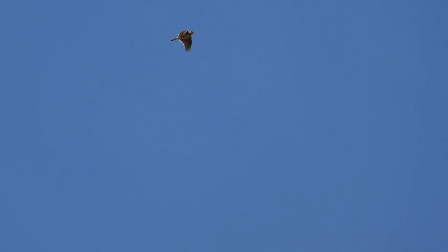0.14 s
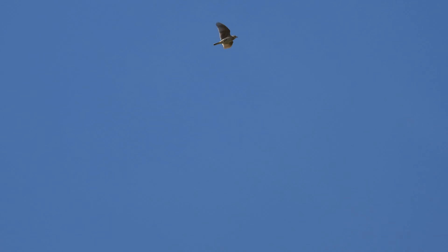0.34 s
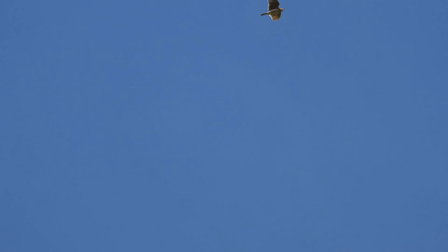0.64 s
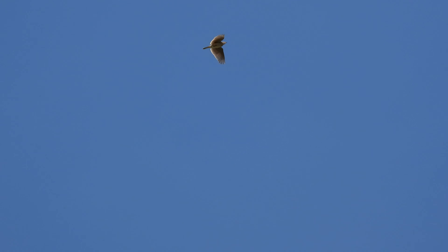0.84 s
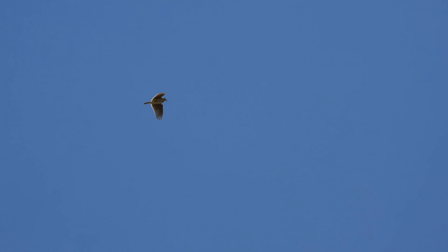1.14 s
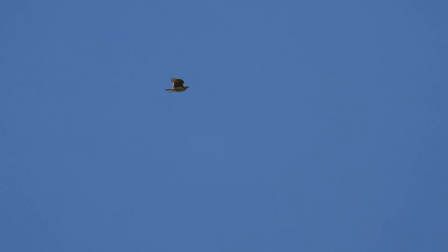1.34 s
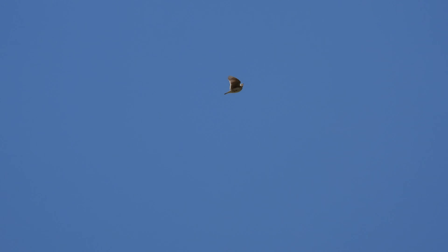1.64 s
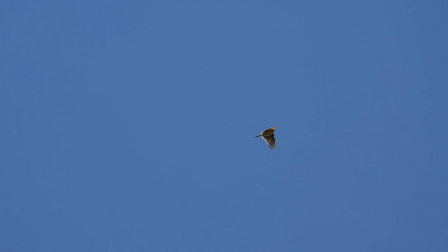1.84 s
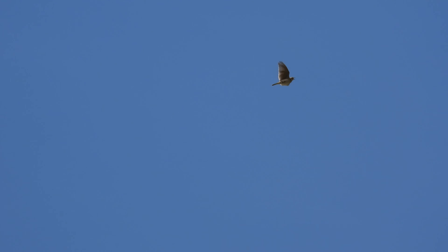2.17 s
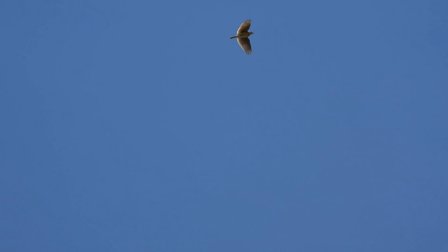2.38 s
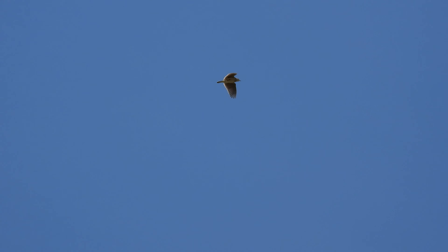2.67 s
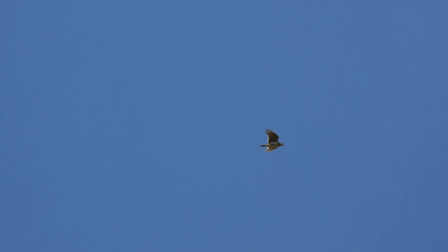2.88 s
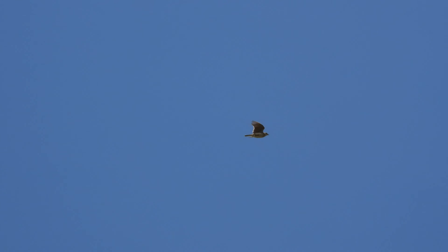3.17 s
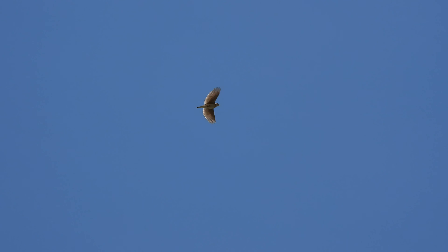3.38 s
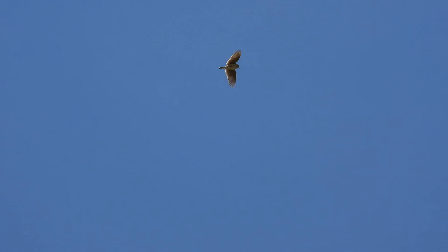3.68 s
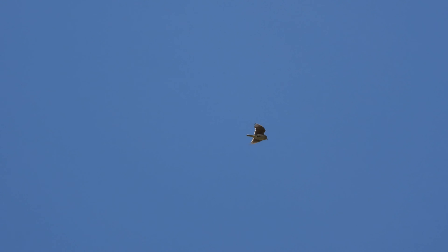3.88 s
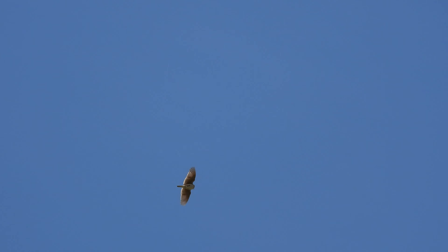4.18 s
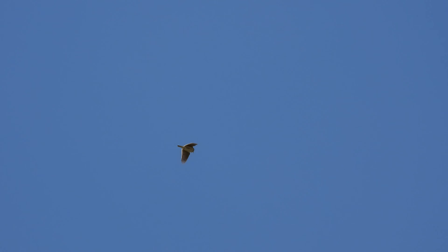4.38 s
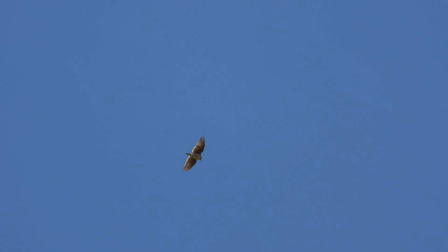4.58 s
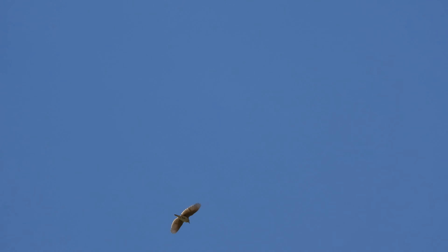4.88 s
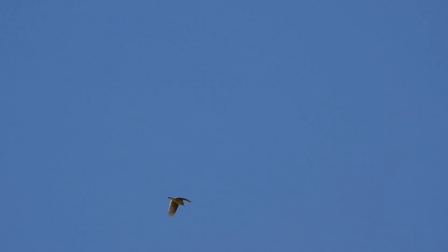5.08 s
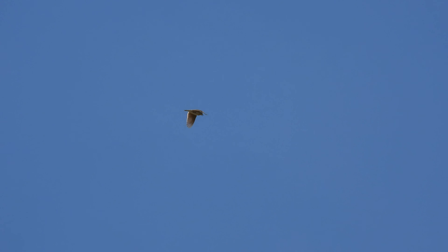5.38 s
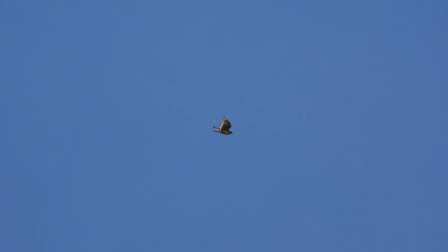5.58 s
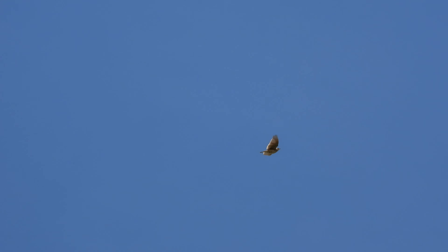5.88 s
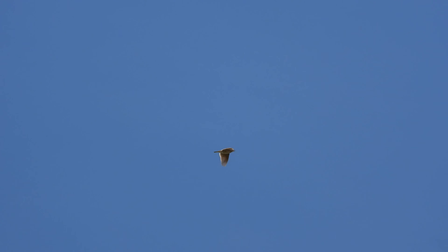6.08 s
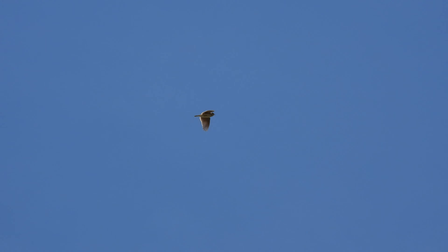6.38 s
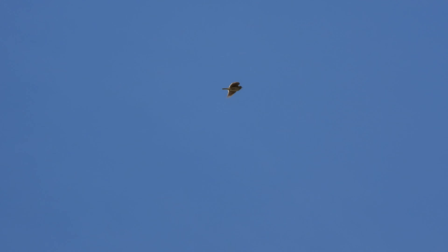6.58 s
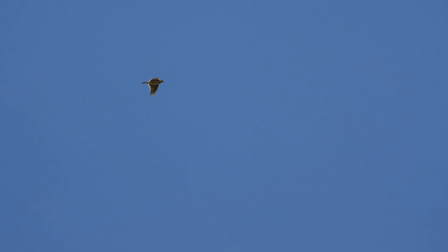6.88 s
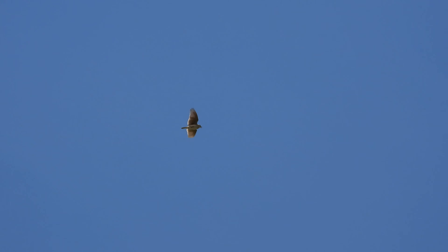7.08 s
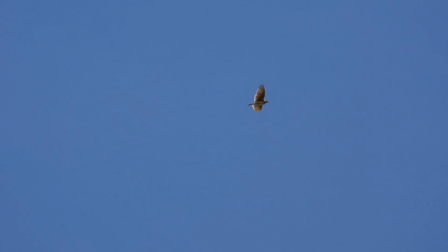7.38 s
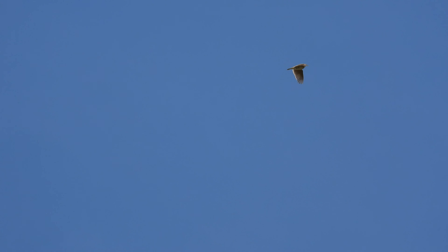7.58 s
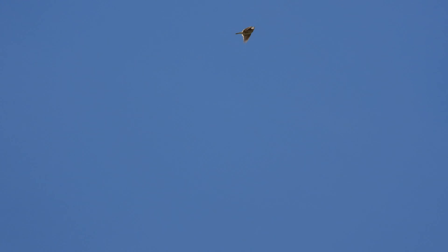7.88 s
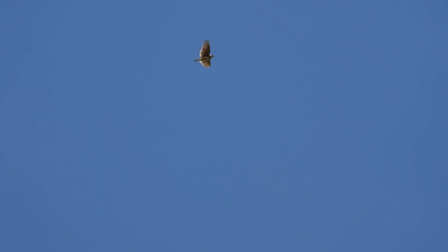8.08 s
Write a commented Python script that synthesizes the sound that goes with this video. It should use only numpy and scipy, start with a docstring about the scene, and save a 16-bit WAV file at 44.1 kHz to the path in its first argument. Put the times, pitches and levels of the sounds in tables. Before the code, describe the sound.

A skylark pours out rapid high trills, zigzag chirps and buzzes overhead while gusty wind rumbles and flaps against the microphone in open grassland.

```python
"""Open grass under gusty wind: a skylark sings overhead, fainter larks call further off, and a far hush lies behind.
The song is a frequency-modulated near sine: glides, zigzags, trills and buzzes from a two-sided syrinx.
Short faint sweeps give the far calls and low lead-ins to some buzzes; grass and ground scatter a thin haze.
Wind is filtered noise modulated in lumps, with thumps and flaps at two microphone ports.
Crackles and ticks are brief snaps, most of them much stronger at one port."""
import sys
import numpy as np
from scipy import signal
from scipy.fft import rfft, irfft, next_fast_len
from scipy.io import wavfile
from scipy.ndimage import uniform_filter1d

SR = 44100
rng = np.random.default_rng(int(sys.argv[2]) if len(sys.argv) > 2 else 0)


def to_wav(s):
    """Save 16-bit WAV."""
    ch = np.atleast_2d(s).T  # columns
    pcm = np.round(np.clip(ch, -1, 1) * 32767)  # PCM
    wavfile.write(sys.argv[1], SR, pcm.astype(np.int16))


N = 362943


def amp(db):
    """Decibel law: amplitude ratio of a level in dB."""
    return 10 ** (np.asarray(db) / 20)


def evened(x):
    """Normalisation: scales each channel to an rms of 1."""
    return x / np.sqrt(np.mean(x ** 2, -1, keepdims=True) + 1e-20)


def coloured(x, points):
    """Linear filtering: multiplies the spectrum by gains joined between points on a log frequency axis."""
    size = next_fast_len(x.shape[-1] + 4096, real=True)
    f, db = np.transpose(points)
    bins_hz = np.fft.rfftfreq(size, 1 / SR)
    gain = amp(np.interp(np.log(bins_hz + 1), np.log(f), db))
    return irfft(rfft(x, size) * gain, size)[..., :x.shape[-1]]


def wander(hz, channels):
    """Band-limited chance: noise of rms 1 that moves up to about hz times a second."""
    band = [(hz / 6, -12), (hz / 3, 0), (hz, -6), (hz * 3, -40), (hz * 12, -110)]
    return evened(coloured(rng.standard_normal((channels, N)), band))


def add(mix, s, sound):
    """Superposition: adds a sound to the mix from time s on."""
    part = mix[..., round(s * SR):][..., :sound.shape[-1]]
    part += sound[..., :part.shape[-1]]


def panned(sound, pan_db):
    """Level difference: the louder port keeps the level, the other falls by pan_db (plus is left)."""
    return sound * amp(np.minimum([[pan_db], [-pan_db]], 0))


# overall colour of the far hush: (f/Hz, gain/dB)
HUSH_COLOUR = [(25, -15.5), (45, -12.5), (70, -1.5), (100, 3.5), (300, 10.5), (1900, -11.5), (2100, -13.5),
               (5500, -25), (6500, -51), (7200, -83), (15000, -85.5)]


def air():
    """Independent modulation: a far hush whose low, middle and high parts drift apart."""
    bands = [[(900, -5.5), (1800, -34.5)],
             [(1000, -30), (2000, -7.0), (3000, -10.5), (4200, -23.0)],
             [(2800, -24.5), (4200, -3.5)]]
    hush = np.zeros((2, N))
    for band in bands:
        drift = amp(5.2 * wander(9.7, channels=1))
        hush += coloured(rng.standard_normal((2, N)) * drift, band)
    return amp(-49.5) * evened(coloured(hush, HUSH_COLOUR))


# the breeze between gusts: (t/s, strength level/dB, upper rustle level against it/dB)
BREEZE = [(0, -38.5, -22), (.2, -35.5, -25.5), (0.548, -40, -16.5), (.9, -39.5, -21), (1.098, -50.5, -11.5),
          (1.44, -48.5, -18), (1.75, -45, -12.5), (2.5, -37.5, -21), (2.95, -38.5, -21), (3.3, -35.5, -27),
          (3.55, -37, -22.5), (3.849, -50, -9.5), (4.099, -39.5, -26.5), (4.449, -35, -29),
          (4.802, -47.5, -19), (4.919, -34, -31.5), (5.198, -41, -26), (5.8, -40, -25), (6.201, -39, -14),
          (6.598, -38, -12), (7.0, -35.5, -19.5), (7.801, -35, -21), (8.23, -34.5, -15)]
# gusts (plus) and lulls (minus): (middle t/s, length/s, change of strength/dB, change of rustle against it/dB)
GUSTS = [(0.748, 0.49, 6.5, 7.5), (1.587, 0.24, 16, 1.5), (2.612, 0.048, -15.5, 13.5), (2.688, 0.1, 12, -1),
         (2.84, 0.2, -16, 9.5), (3.439, 0.21, 9.5, 9.5), (4.061, 0.11, 8.5, 2), (4.525, 0.2, -13, 13),
         (5.054, 0.3, 10.5, 5.5), (5.945, 0.35, 6.5, -6), (6.331, 0.11, 4, -26), (6.387, 0.1, -8.5, 13),
         (6.518, 0.15, 9, -1), (6.672, 0.063, -12.5, 3.5), (6.722, 0.049, -8, 8.5), (6.817, 0.12, 7.5, 4),
         (7.882, 0.058, -4.5, 13.5), (7.954, 0.12, -35, -6), (8.041, 0.33, 4.5, -5.5)]


def wind_strength():
    """Superposed envelopes: the breeze's strength and rustle in dB plus a smooth swell for each gust or lull."""
    t = np.arange(N) / SR
    s, *curves = np.transpose(BREEZE)
    out = np.array([np.interp(t, s, c) for c in curves])
    for middle, length, *change_db in GUSTS:
        swell = np.hanning(round(length * SR))
        add(out, middle - length / 2, np.outer(change_db, swell))
    return out


# sizes of eddy, as the pitch each one rumbles at: (f/Hz)
EDDIES = [151.5, 286.8, 462.7, 767]
# colour of the low wind: (f/Hz, gain/dB)
BODY = [(60, -75.5), (100, -37.5), (190, 4), (290, 2.5), (420, 1), (900, -19), (1300, -47), (3000, -99)]
# colour of the upper rustle: (f/Hz, gain/dB)
RUSTLE = [(500, -30), (1050, 2.5), (1850, -10.5), (2050, -27), (2600, -61.5)]
# colour of the top of the rustle: (f/Hz, gain/dB)
SPIT = [(1700, -63.5), (2100, -21), (3500, -26.5), (6000, -44), (6800, -48), (7800, -66), (9500, -100)]


def wind():
    """Turbulence: eddies of several sizes roll over both ports at once but push each in its own way."""
    width = 2.1  # frequency ratio at which an eddy has fallen 30 dB
    top_db = 11  # soft ceiling of the lumps
    strength_db, sharp_db = wind_strength()
    lumps_db = 4 * wander(22, channels=1) + 3.3 * wander(41, channels=2)
    push = amp(strength_db) * rng.standard_normal((2, N))
    push = push + 0.085 * push[::-1]  # a little of each port in the other

    body = np.zeros((2, N))
    for hz in EDDIES:
        eddy_db = lumps_db + 5.2 * wander(28, channels=2)
        lumpy = push * amp(top_db * np.tanh(eddy_db / top_db))
        body += coloured(lumpy, [(hz / width, -30), (hz, 0), (hz * width, -30)])

    flicker_db = 3.66 * wander(300, channels=2) + 2.77 * wander(110, channels=2)
    fizz_db = sharp_db + top_db * np.tanh(0.82 * lumps_db / top_db) + flicker_db
    fizz = push * amp(fizz_db)
    spit = fizz * amp(6 * wander(21, channels=1) - 3.5)
    upper = amp(18) * (coloured(fizz, RUSTLE) + coloured(spit, SPIT))
    return amp(17) * coloured(body, BODY) + panned(upper, -2.8)


# colour of a small buffet: (f/Hz, gain/dB)
FLAP = [(60, -56), (150, -23), (350, 6.5), (700, 3), (1300, -17.5), (2000, -26), (4000, -45), (7000, -68.5)]


def flaps():
    """Poisson impulses: small eddies slap each port at random in short sharp puffs that grow with the wind."""
    per_s, above_wind_db, spread_db = 22, 20.5, 3.5
    rise_s, fall_s = 0.0025, 0.0034
    sizes = amp(spread_db * rng.standard_normal((2, N)))
    slaps = (rng.random((2, N)) < per_s / SR) * sizes
    t = np.arange(1024) / SR
    puff = np.minimum(t / rise_s, 1) * np.exp(-t / fall_s)
    puffs = signal.oaconvolve(slaps, puff[None], axes=1)[:, :N]
    strength = amp(wind_strength()[0] + above_wind_db)
    return coloured(strength * puffs * rng.standard_normal((2, N)), FLAP)


# single large buffets: (t/s, relative level/dB, left-right level/dB)
THUMPS = [(0.169, -21.5, -8.5), (0.222, -22.5, -6.5), (0.503, -25, 2), (0.708, -10, 4),
          (0.744, -11.5, -2.5), (0.792, -22.5, -1), (0.814, -23, -2), (0.93, -20, 0.5), (0.986, -28, -3.5),
          (1.149, -26.5, -2), (1.56, -16, 11.5), (1.704, -27, 1), (2.015, -21, -7.5), (2.673, -18, 2),
          (3.021, -25, 27.5), (3.427, -24.5, -6.5), (3.998, -22, 0.5), (4.044, -19, 13), (4.887, -25.5, 5),
          (4.96, -24, -1.5), (5.03, -14, -7), (5.06, -16, 8), (5.193, -16, -8), (5.356, -22, 23),
          (5.495, -27.5, 4), (6.181, -30, -9.5), (6.303, -22, -6), (6.598, -21.5, -2.5), (6.691, -25, 0),
          (6.751, -21.5, -0.5), (6.8, -22.5, 0.5), (7.91, -20, -14.5), (7.986, -23.5, -12.5)]
# colour of a large buffet: (f/Hz, gain/dB)
THUMP = [(90, -44), (190, 1), (420, 5), (900, -7.5), (1600, -27), (2200, -45), (7000, -62.5), (7500, -100)]


def thumps():
    """Damped pressure pulse: each large eddy is a quick puff of low noise that dies in a few cycles."""
    out, t = np.zeros((2, N)), np.arange(2048) / SR
    envelope = np.minimum(t / 0.0071, 1) * np.exp(-t / 0.005)
    for s, db, pan_db in THUMPS:
        puff = rng.standard_normal((2, len(t))) * envelope
        add(out, s, panned(amp(db + 21.0) * puff, pan_db))
    return coloured(out, THUMP)


# crackles, most of them in one port: (t/s, relative level/dB, left-right level/dB)
CRACKLES = [(0.652, -50.5, 20), (0.7472, -42, 16), (0.7532, -42, -16), (2.7294, -45, 39),
            (3.655, -43.5, 32.5), (4.939, -43.5, -25), (5.063, -59.5, -9), (6.0697, -41, -39.5),
            (6.2564, -46, -44), (6.8193, -46, -36), (6.8906, -39.5, -41)]


def crackles():
    """Impulsive noise: a thin wide-band tick over weak noise that dies more slowly."""
    out, t = np.zeros((2, N)), np.arange(512) / SR
    envelope = np.exp(-t / 0.0006) + 0.16 * np.exp(-t / 0.028)
    for s, db, pan_db in CRACKLES:
        snap = amp(db + 2.5) * rng.standard_normal(len(t)) * envelope
        add(out, s, panned(snap, pan_db))
    return coloured(out, [(150, -51), (1000, 29.5), (7000, -2.5), (15000, -3)])


# duller ticks of the membrane, each heard 1 ms after t: (t/s, relative level/dB, left-right level/dB)
TICKS = [(2.4672, -31, -28), (5.5381, -39, -8), (6.4444, -30, -34), (6.461, -25.5, -39.5),
         (6.47, -29, -24.0), (6.5033, -40, -18), (6.5117, -54, -24), (6.5367, -39, -29), (6.5678, -25, -33),
         (6.8019, -32, -20), (6.833, -51, -25.5), (7.0857, -45, -8), (7.188, -47, -13), (7.2544, -62, -1.5),
         (7.498, -41, -13.5), (7.6664, -55, -17.0), (7.8385, -33.5, -26), (7.8952, -58, -23.5),
         (8.1556, -29.5, -19)]
# colour of a tick: (f/Hz, gain/dB)
TICK = [(150, -50), (600, -10), (1200, 0), (2500, -7), (5000, -19), (7000, -28), (7800, -52), (10000, -75)]


def ticks():
    """Impulse response: filtered single snaps, stronger at right, over a random patter that follows the rustle."""
    per_s, above_rustle_db, spread_db = 98, 10, 5.5
    level_db = wind_strength().sum(0) + above_rustle_db + spread_db * rng.standard_normal(N)
    patter = (rng.random(N) < per_s / SR) * amp(level_db)
    out = panned(patter * rng.choice([-1, 1], N), -11.5)
    for s, db, pan_db in TICKS:
        add(out, s + .001, panned(amp(db + 22) * np.ones(1), pan_db))
    return coloured(out, TICK)


def field(x, t60=0.04, far_t60=0.25, far_db=-5):
    """Diffuse scattering: grass and ground return a thin haze, different at each port, near part and slower far part."""
    t = np.arange(SR // 2) / SR
    decay = amp(-60 * t / t60) + amp(far_db - 60 * t / far_t60)
    tail = rng.standard_normal((2, len(t))) * decay
    return signal.oaconvolve(x[None], tail / np.linalg.norm(tail[0]), axes=1)[:, :N]


QUIVER = signal.butter(2, 260, fs=SR, output="sos")  # lowpass at 260 Hz


def note(shape, trill, factor=1, scoop=1, rise_s=0.004, rough=1):
    """Frequency modulation: a near sine with a weak octave; a trill saws the pitch and chokes the air at each reset."""
    s, hz, db = np.transpose(shape)
    t = np.arange(0, s[-1] - s[0], 1 / SR)
    trill_s, *trill_curves = np.transpose(trill)
    rate, swing, throb = (np.interp(t, trill_s, c) for c in trill_curves)
    # no two pulses alike
    unsteady = rough * evened(signal.sosfiltfilt(QUIVER, rng.standard_normal((2, len(t)))))
    beat = np.cumsum(rate * (1 + 0.15 * unsteady[0]) / SR) % 1
    saw = beat ** scoop - 1 / (1 + scoop)
    pitch = factor * (np.interp(t, s - s[0], hz) + swing * saw)
    smooth_pitch = uniform_filter1d(uniform_filter1d(pitch, size=20), size=20)
    turns = 2 * np.pi * np.cumsum(smooth_pitch) / SR

    breath = 1 - np.clip(throb, 0, 1) * np.cos(np.pi * beat) ** 4 * (rate > 0)
    breath = breath * amp(4 * throb * unsteady[1])  # rasp
    edges = signal.windows.tukey(len(t), min(1, 300 / len(t)))
    level = np.sqrt(2) * amp(np.interp(t, s - s[0], db)) * breath * edges
    level = level * np.minimum(t / min(rise_s, t[-1] / 3), 1)
    return level * (np.sin(turns) + amp(-51) * np.sin(2 * turns))


def swoop(start, length, first_hz, middle_hz, last_hz, db, swell_db):
    """Parabolic glide: a smooth bend of pitch through three points, under a steady swell in dB."""
    u = np.linspace(-1, 1, 9)
    slope = (last_hz - first_hz) / 2
    bend = (first_hz + last_hz) / 2 - middle_hz
    hz = middle_hz + slope * u + bend * u ** 2
    return np.transpose([start + length * (u + 1) / 2, hz, db + swell_db * u / 2])


# short faint sweeps: far calls, and low lead-ins just before some buzzes:
# (t/s, length/s, first f/Hz, last f/Hz, relative level/dB)
FAINT = [(1.95, 0.043, 3990, 3900, -68.5), (2.782, 0.029, 5100, 4760, -68), (2.948, 0.016, 4900, 4160, -64),
         (2.977, 0.024, 4100, 5760, -58.5), (3.004, 0.015, 5630, 4080, -61),
         (3.268, 0.0097, 4800, 6200, -62.5), (0.298, 0.053, 4670, 4550, -68),
         (0.691, 0.048, 3550, 3100, -63), (1.208, 0.074, 4630, 4700, -69), (2.476, 0.052, 4720, 4990, -63),
         (3.58, 0.017, 4390, 5650, -62), (3.597, 0.012, 4340, 5580, -56.5),
         (3.609, 0.0094, 4430, 5640, -53), (3.612, 0.024, 5000, 2880, -62), (4.2, 0.041, 3450, 2550, -68.5),
         (4.283, .025, 2650, 2880, -66), (4.727, 0.054, 2710, 3055, -65), (5.015, 0.039, 5020, 4200, -65),
         (5.343, 0.049, 3580, 2944, -68), (5.422, 0.016, 4180, 5085, -68), (5.428, 0.031, 5070, 4100, -66),
         (5.841, 0.025, 3320, 3320, -63), (6.6, 0.15, 4670, 4760, -68), (7.429, 0.024, 5630, 4700, -73),
         (7.452, .018, 4250, 4165, -79), (7.572, 0.029, 3170, 3500, -64), (7.598, 0.016, 3150, 2900, -70.5),
         (2.265, 0.041, 2954, 3330, -72), (0.17, 0.042, 3650, 3714, -66.5), (7.741, 0.038, 4100, 2940, -66),
         (7.891, 0.026, 4700, 4300, -65)]
# a far lark's fading runs of falling pips: (start t/s, relative level/dB)
PIP_RUNS = [(0.096, -60), (.91, -70)]


def faint_sweeps():
    """Swept tones: short faint glides that swell and fade, for far calls, pips and lead-ins to some buzzes."""
    count, gap_s, pip_s, first_pip_hz, last_pip_hz, fade_db = 6, .0229, .012, 5750, 4650, -1.8
    pips = [(s + k * gap_s, pip_s, first_pip_hz, last_pip_hz, db + k * fade_db)
            for s, db in PIP_RUNS for k in range(count)]
    out = np.zeros(N)
    for s, length, first_hz, last_hz, db in FAINT + pips:
        sweep = note([(0, first_hz, db), (length, last_hz, db)], [(0, 140, 120, 0.45)])
        add(out, s, amp(-0.5) * sweep * signal.windows.tukey(len(sweep), .7))
    return out


# syllable shapes: (t/s within the syllable, f/Hz, relative level/dB)
CLIMB = [(0.0, 2500, -62.5), (0.02, 3200, -56), (0.045, 3950, -56.5), (0.058, 4400, -51),
         (0.07, 5100, -50.5), (0.081, 6130, -57), (0.089, 6300, -59.5), (0.098, 6000, -50),
         (0.104, 4540, -48.5), (0.108, 3200, -69)]
FALL = [(0.0, 6750, -61.5), (0.014, 6560, -54.5), (0.03, 6100, -49.5), (0.05, 5530, -44),
        (0.075, 4980, -44.5), (0.11, 3950, -54.5), (0.13, 3580, -56), (0.153, 3530, -53)]
RISE = [(0.0, 3510, -49), (0.0274, 3574, -46.5), (0.0589, 3955, -52.5), (0.0808, 4250, -41.5),
        (0.1003, 4856, -41), (0.1043, 4960, -40), (0.107, 4340, -55.5), (0.113, 2980, -64)]
BUZZ = [(0.005, 3310, -60.5), (0.016, 3346, -53.5), (0.0304, 3450, -50), (0.0619, 3420, -47),
        (0.09, 3060, -49), (0.101, 2830, -57.5), (0.112, 2400, -65.5)]
GRACE = [(0, 2980, -59), (.014, 3260, -63), (.025, 3220, -48)]
# how a trill shakes each shape: (t/s from its start, pulse rate/Hz, pitch swing/Hz, throb 0-1)
CLIMB_TRILL = [(0, 140, 259, 0.66), (.05, 139, 251, 0.79), (0.064, 140, 1.5, 0.061)]
FALL_TRILL = [(0, 102.6, 522, 1), (0.062, 99.8, 1435, 0.83), (0.071, 195, 1100, .8), (.125, 225, 900, 0.6),
              (.153, 230, 250, 0.3)]
RISE_TRILL = [(0, 117, 0, 0.12), (0.059, 119, 0.0019, 0.74), (.1, 150, 0, .3)]
BUZZ_TRILL = [(0, 183.4, -520, .9), (.05, 184.6, -380, 0.6), (.075, 176, -150, 0.4), (.12, 163, -50, 0.3)]
GRACE_TRILL = [(0, 140, 150, 0.5)]
# when each shape is sung: (t/s, gain/dB, pitch factor)
CLIMBS = [(0.222, 4.5, 1.04), (0.408, 1, 1.04), (0.599, 2.5, 1.033), (0.788, -4.5, 1.01),
          (0.98, -3.5, 1.015)]
FALLS = [(2.372, 2.5, 0.99), (2.679, -4, 1.0), (2.998, 1, 0.97), (3.319, 2, 0.98), (3.637, -5, 1)]
RISES = [(2.2132, -2, 1.013), (2.514, -1.5, 1.01), (2.823, -5.5, 0.99), (3.144, -2, 1.017),
         (3.465, -1.5, 1.009), (3.79, -14, 1.007)]
BUZZES = [(4.294, -3, 1), (4.76, 0, 1), (5.399, 1, 0.99), (6.033, -3, 0.99), (6.5192, -9.5, 1.02),
          (6.996, -13.5, 1.005), (7.473, -11.5, 1.01)]
GRACES = [(0.186, -1.5, 0.92), (0.379, -2.5, 0.91), (0.566, -3, 0.96), (0.954, -14, 1)]


def syllables(song):
    """Repeated motifs: each trilled shape returns with its own gain and pitch factor."""
    for shape, trill, sung, rough in [(CLIMB, CLIMB_TRILL, CLIMBS, 1),
                                      (FALL, FALL_TRILL, FALLS, .65),
                                      (RISE, RISE_TRILL, RISES, .5),
                                      (BUZZ, BUZZ_TRILL, BUZZES, .4),
                                      (GRACE, GRACE_TRILL, GRACES, .5)]:
        for s, db, factor in sung:
            add(song, s + shape[0][0], amp(db) * note(shape, trill, factor, rough=rough))


def flicks():
    """Second source: the other voice flicks upward above the climb, faster and faster and louder."""
    count, first_s, gap_s, quickens, length_s = 5, .0145, .015, .935, .0055
    from_hz, to_hz, sinks_hz = 300, 1500, 150  # start and end above the climb; lower by sinks_hz each time
    first_db, grows_db = -53.5, 3
    s, hz, _ = np.transpose(CLIMB)
    gaps = gap_s * quickens ** np.arange(count - 1)
    starts = first_s + np.cumsum(np.r_[0, gaps])
    under_hz = np.interp(starts, s, hz) - sinks_hz * np.arange(count)
    return [(start, length_s, f + from_hz, f + (from_hz + to_hz) / 2, f + to_hz, first_db + k * grows_db, 0)
            for k, (start, f) in enumerate(zip(starts, under_hz))]


# no trill: (t/s, pulse rate/Hz, pitch swing/Hz, throb 0-1)
PLAIN = [(0, 0, 0, 0)]
# strokes of a zigzag:
# (t/s from its start, length/s, first f/Hz, middle f/Hz, last f/Hz, relative level/dB, swell/dB)
STROKES = [(0, 0.047, 4040, 4883, 5340, -43, 8), (.045, 0.0065, 5100, 4220, 2900, -51.5, -9),
           (.05, 0.012, 5180, 4180, 5250, -53.5, -0.5), (.058, 0.0099, 2840, 3400, 3900, -55.5, 1.5),
           (.064, .014, 4420, 5030, 5520, -41.5, -8), (.0765, .008, 5500, 4900, 4200, -41.5, 5),
           (.087, 0.011, 2980, 3390, 3600, -57, 9.5), (.094, 0.032, 4475, 5570, 5734, -45, -14)]
# when zigzags are sung: (t/s, gain/dB, pitch factor)
ZIGZAGS = [(3.969, -9, 1.017), (4.124, -4, 1.042), (4.4359, -7, 0.993), (4.594, -4.5, 1.034),
           (4.905, -4.5, 0.99), (5.065, -5.5, 1.042), (5.231, -1.5, 1.038), (5.543, -0.5, 1),
           (5.703, 1.5, 1.028), (5.8764, 0.5, 1.0344), (6.184, -6.5, 0.98), (6.344, -8.5, 1.0293),
           (6.6657, -11.5, 0.99), (6.824, -15, 1.05), (7.1405, -13.5, 0.99), (7.302, -13, 1.027),
           (7.622, -11.5, 0.98), (7.785, -10.5, 1.0386)]


def zigzags_and_flicks(song):
    """Piecewise glides: plain strokes chained or overlapped, in zigzags and above the climbs."""
    for strokes, sung in [(STROKES, ZIGZAGS), (flicks(), CLIMBS)]:
        for s, db, factor in sung:
            for row in strokes:
                stroke = note(swoop(*row), PLAIN, factor, rise_s=row[1] / 6)
                add(song, s + row[0], amp(db) * stroke)


# whistles sung once: (t/s, length/s, first f/Hz, middle f/Hz, last f/Hz, relative level/dB, swell/dB)
WHISTLES = [(0.044, 0.022, 4287, 4760, 5530, -56, -8), (0.065, 0.0184, 4030, 4600, 5040, -53.5, -1),
            (1.134, 0.043, 6900, 5820, 4610, -56.5, 20), (1.175, 0.0091, 4930, 4400, 3900, -57, -5),
            (1.18, 0.0259, 5780, 5180, 5000, -55, 12), (1.202, 0.0071, 4900, 4330, 3600, -60, -4),
            (1.413, 0.037, 6670, 6400, 5800, -60, 21), (1.447, 0.05, 5800, 5640, 5620, -53, -10),
            (1.496, 0.028, 5610, 4970, 4500, -49, 5), (1.518, 0.013, 5800, 4240, 2970, -55, 4),
            (1.534, 0.015, 3020, 3690, 4500, -54.5, -16), (1.548, 0.0099, 4580, 3670, 3000, -52.5, 9),
            (1.594, 0.021, 4440, 4600, 5430, -57, 10), (1.613, 0.021, 3980, 4810, 5050, -44.5, 11),
            (1.632, .007, 5200, 4400, 3500, -50, -5), (1.642, 0.016, 4380, 4710, 5170, -45.5, -7),
            (1.653, 0.0069, 5000, 4340, 3600, -53, -4), (1.67, 0.013, 6440, 5940, 4100, -52, 20),
            (1.685, 0.035, 5700, 4700, 4305, -47.5, -5), (1.689, 0.1, 4880, 3630, 3200, -57, -1),
            (1.791, 0.028, 5250, 4550, 3560, -65, -6), (1.816, 0.032, 3830, 4700, 3700, -66.5, 1),
            (1.935, 0.04, 6800, 6380, 6450, -55.5, 7), (2.017, 0.047, 3500, 4440, 3300, -57, 0),
            (2.051, 0.021, 4990, 5500, 6070, -54, 7), (7.968, 0.0089, 3300, 4440, 4540, -55, 2),
            (7.972, 0.028, 4510, 4180, 4020, -57, -13), (8.015, 0.033, 3933, 4340, 6010, -58, 20),
            (8.047, 0.013, 6100, 6470, 6100, -67, -4), (8.057, 0.036, 6470, 5570, 5350, -54.5, 10),
            (8.141, 0.0091, 3970, 4870, 5430, -54, 9), (8.145, 0.023, 5370, 5210, 5400, -49, 1),
            (8.167, 0.0052, 5420, 4530, 4110, -51, -13)]
# trills sung once: (columns as for whistles, then pulse rate/Hz, pitch swing/Hz, throb 0-1)
TRILLS = [(0.0, 0.044, 4350, 3470, 3410, -52.5, 0.91, 191, 299, 0.62),
          (1.245, 0.028, 3800, 3190, 3240, -62, 6.5, 172.6, 405, 0.8),
          (1.301, 0.074, 5390, 4990, 4680, -51.5, 6.4, 96.5, 1500, 0.39),
          (1.846, 0.04, 6530, 6380, 5700, -54, 10, 114, 705, 1),
          (1.88, 0.047, 5300, 5100, 5430, -47.5, 5.6, 86.5, 1797, 0.56),
          (2.072, 0.044, 6050, 5520, 5170, -45, 3.6, 111.4, -900, 0.077),
          (2.151, 0.068, 3380, 3400, 3520, -52.5, 7.1, 193, 650, 0.76)]
# one trill whose pulses scoop up and hold: (columns as for trills)
PURR = (.082, .058, 3900, 3900, 3850, -56, -2, 140, 1700, .25)


def lark():
    """Scintillation: the whole song shimmers a little in level on its way down through turbulent air."""
    song = np.zeros(N)
    syllables(song)
    zigzags_and_flicks(song)
    for row in WHISTLES:
        add(song, row[0], note(swoop(*row), PLAIN))
    for row in TRILLS:
        add(song, row[0], note(swoop(*row[:7]), [(0, *row[7:])], rise_s=0.0061))
    add(song, PURR[0], note(swoop(*PURR[:7]), [(0, *PURR[7:])], scoop=.3))
    return song * amp(0.87 * wander(430, channels=1)[0])


# colour of the birds as they arrive, falling at the top of the treble: (f/Hz, gain/dB)
REACH = [(6600, -1), (7000, 12), (7700, 7), (9500, 1.5), (11500, -4), (13000, -46)]


def scene():
    """Superposition: direct birdsong, its scattered haze, and the wind at both ports."""
    birds = coloured(lark() + faint_sweeps(), REACH)
    direct = np.array([birds, np.roll(birds, 1)])  # the song reaches the left port one sample sooner
    song = amp(5.0) * direct + amp(-3.5) * field(birds)
    return air() + wind() + flaps() + thumps() + crackles() + ticks() + song


def record(dry):
    """Band limitation: the recorder's linear-phase lowpass at 15.8 kHz."""
    padded = np.pad(dry, ((0, 0), (255, 255)), "reflect")
    lowpass = signal.firwin(511, 15800, window=("kaiser", 9), fs=SR)
    return signal.oaconvolve(padded, lowpass[None], "valid", axes=1)


dry = scene()
out = record(dry)
to_wav(out)
```